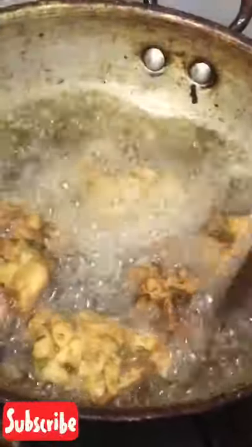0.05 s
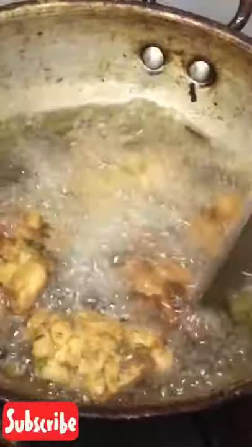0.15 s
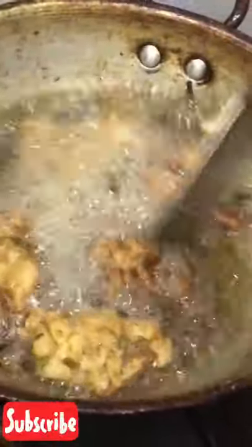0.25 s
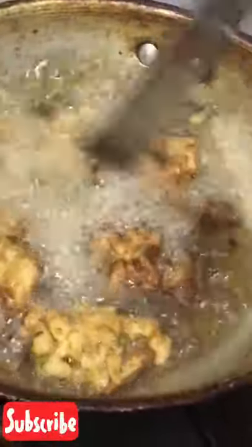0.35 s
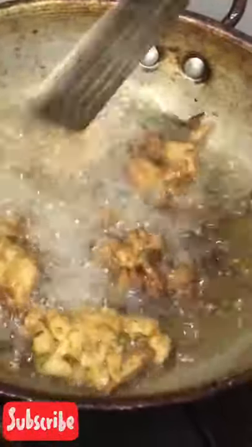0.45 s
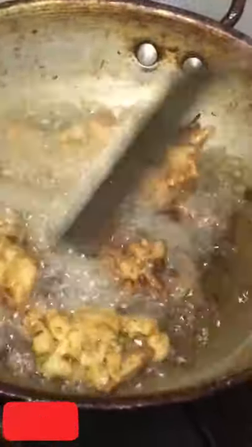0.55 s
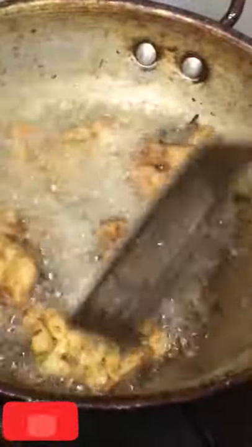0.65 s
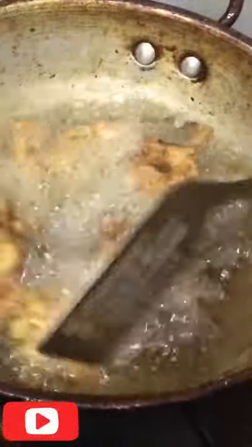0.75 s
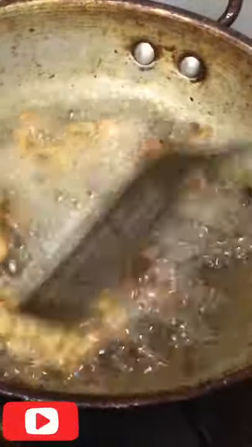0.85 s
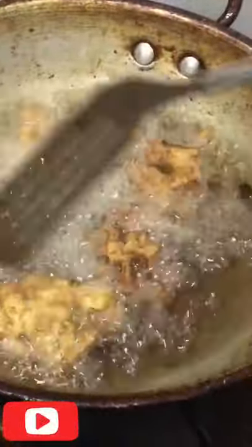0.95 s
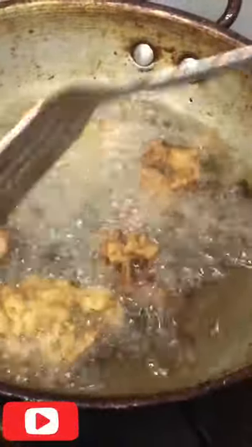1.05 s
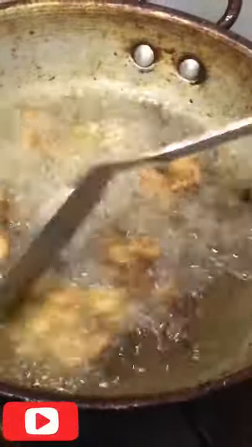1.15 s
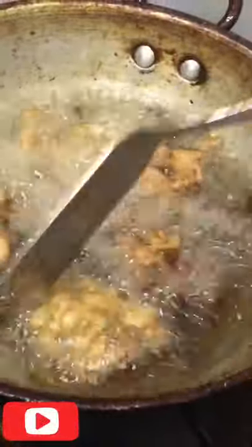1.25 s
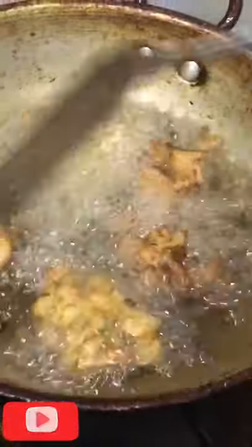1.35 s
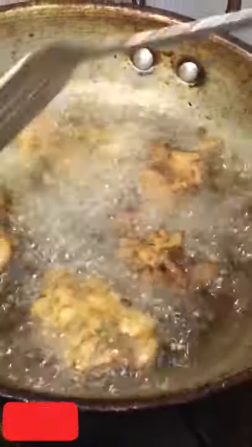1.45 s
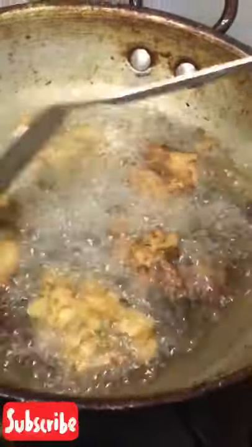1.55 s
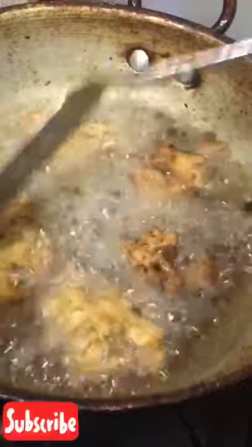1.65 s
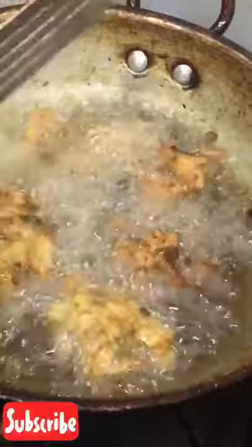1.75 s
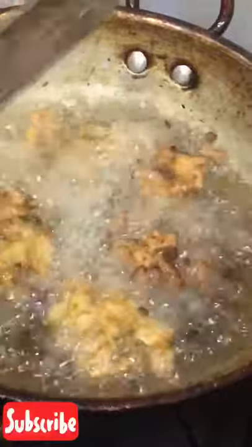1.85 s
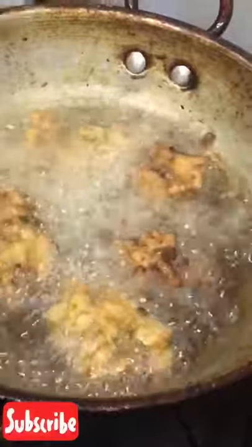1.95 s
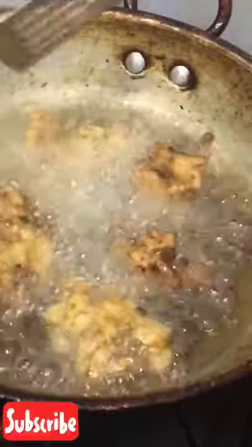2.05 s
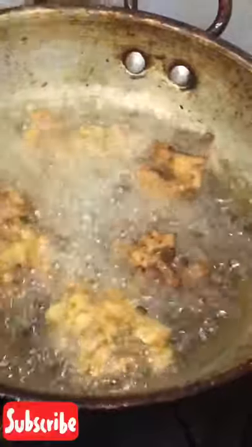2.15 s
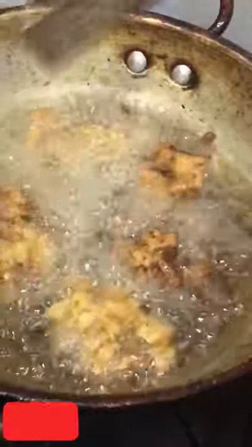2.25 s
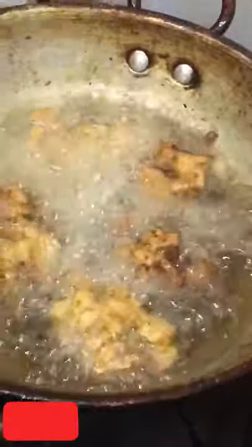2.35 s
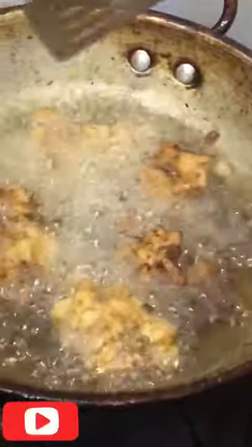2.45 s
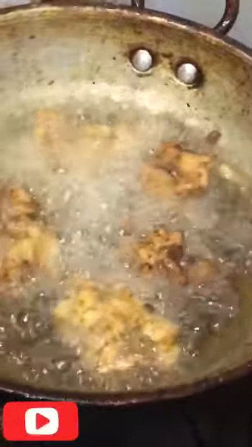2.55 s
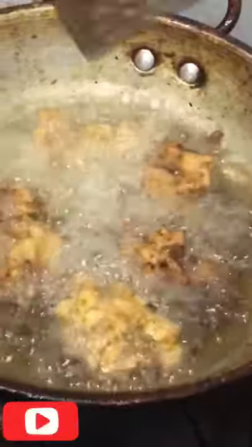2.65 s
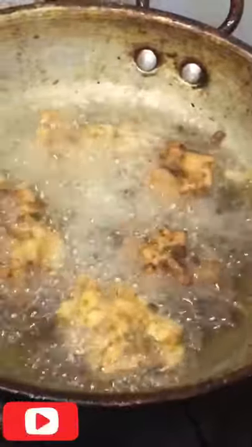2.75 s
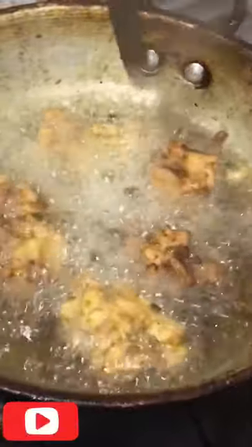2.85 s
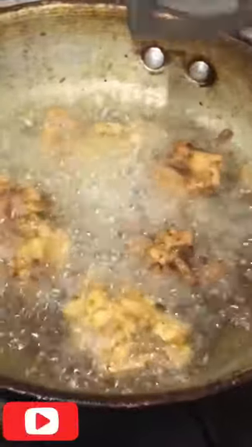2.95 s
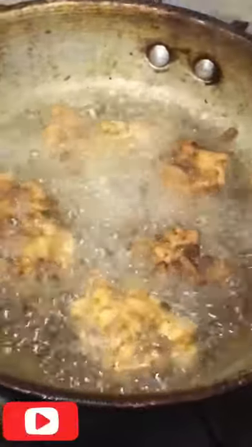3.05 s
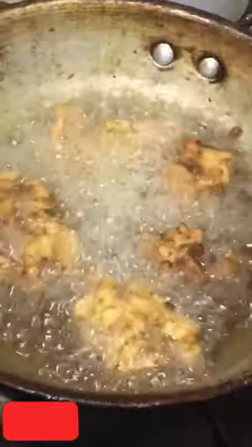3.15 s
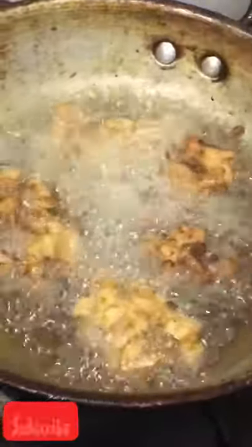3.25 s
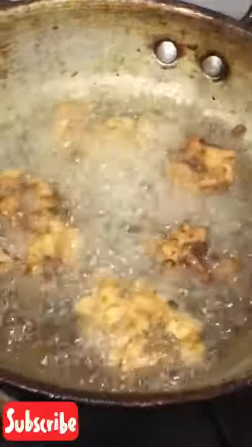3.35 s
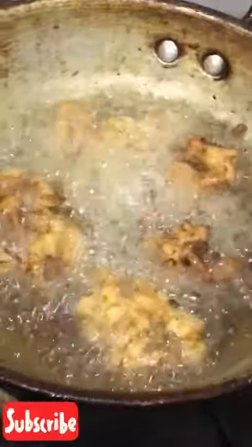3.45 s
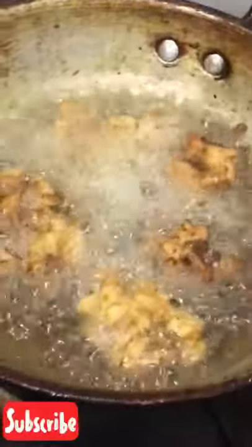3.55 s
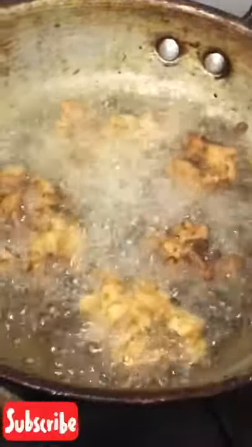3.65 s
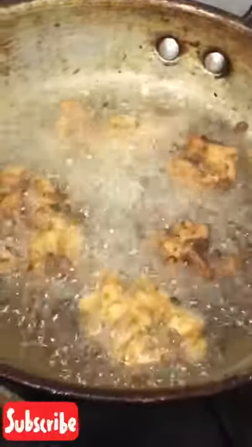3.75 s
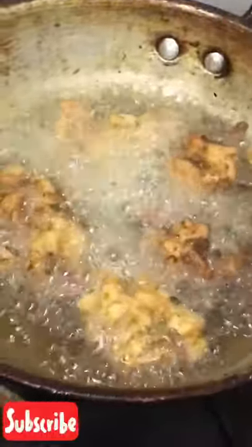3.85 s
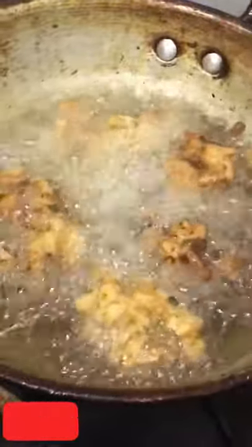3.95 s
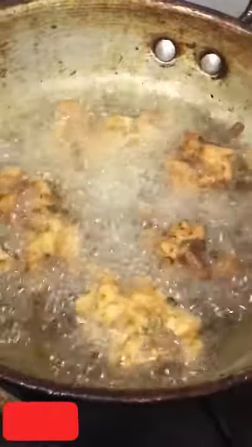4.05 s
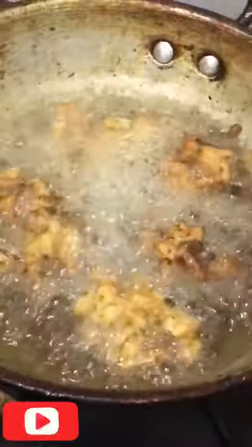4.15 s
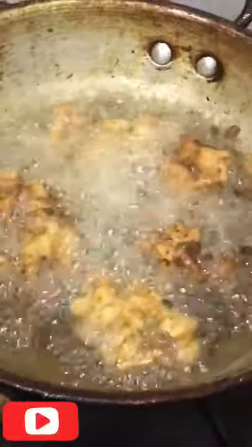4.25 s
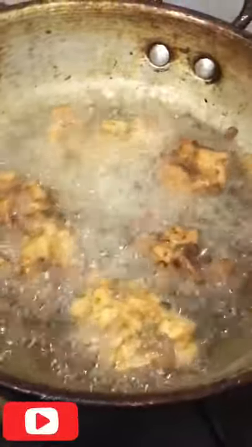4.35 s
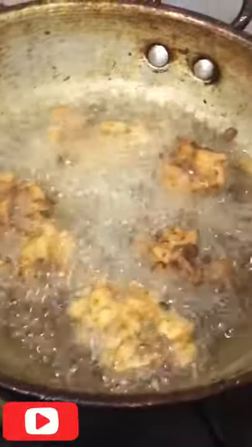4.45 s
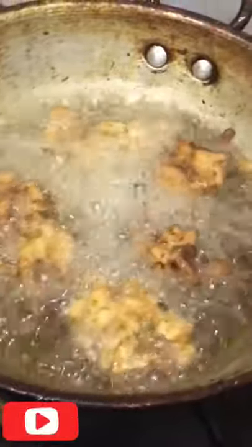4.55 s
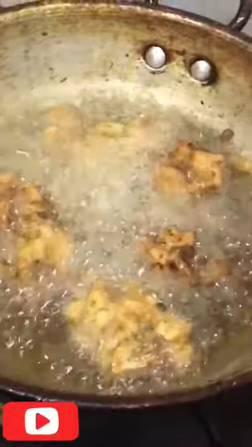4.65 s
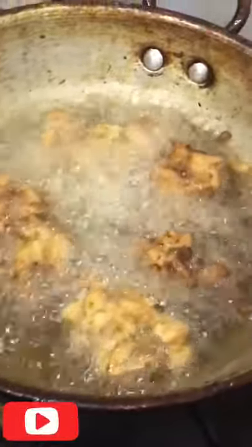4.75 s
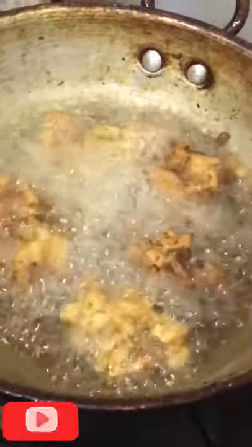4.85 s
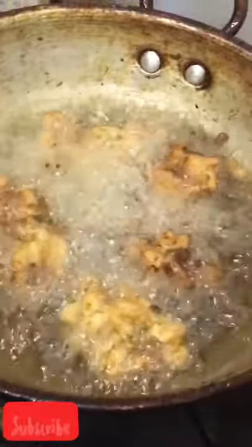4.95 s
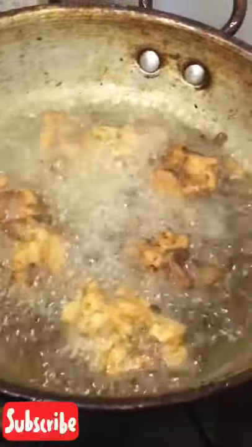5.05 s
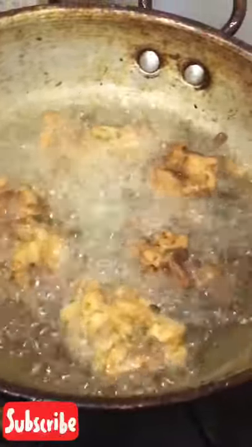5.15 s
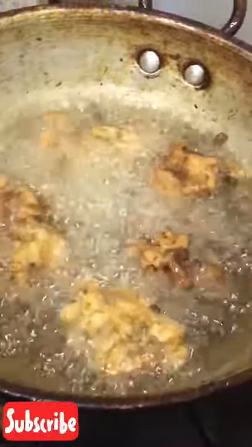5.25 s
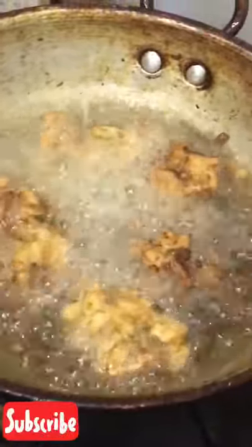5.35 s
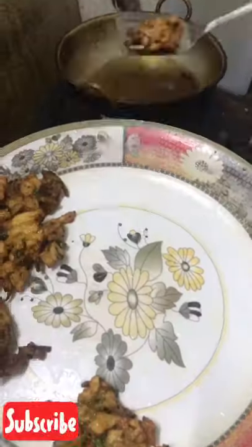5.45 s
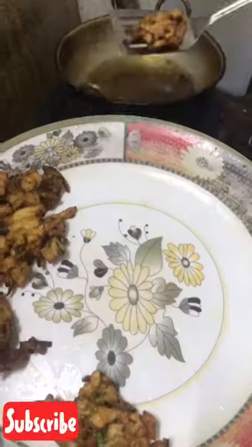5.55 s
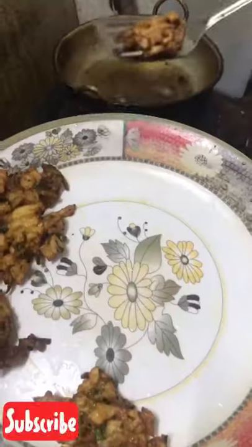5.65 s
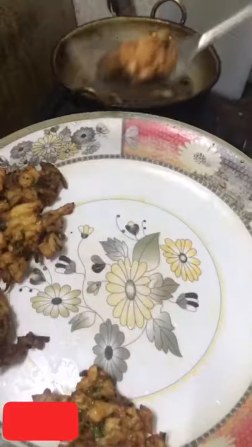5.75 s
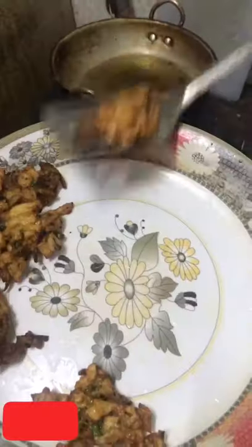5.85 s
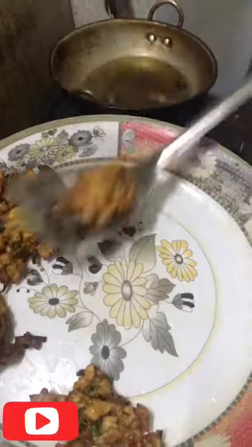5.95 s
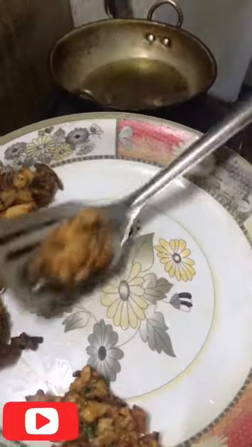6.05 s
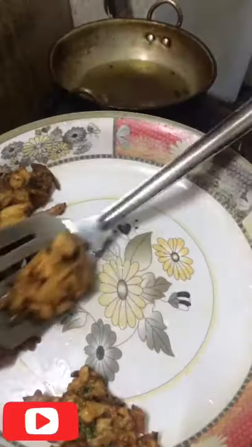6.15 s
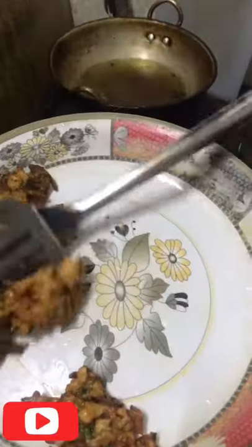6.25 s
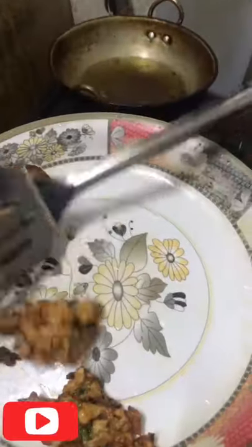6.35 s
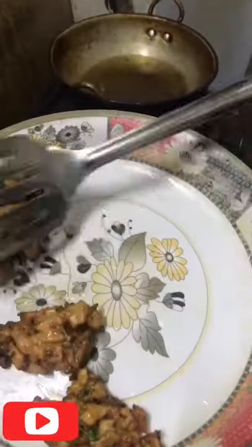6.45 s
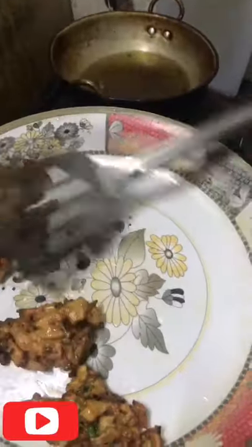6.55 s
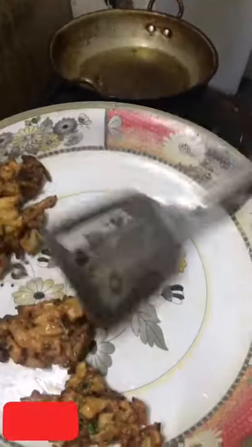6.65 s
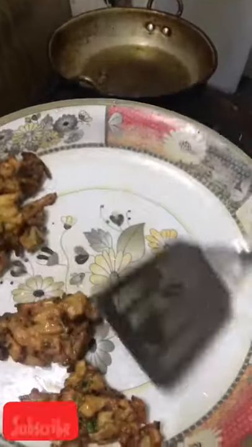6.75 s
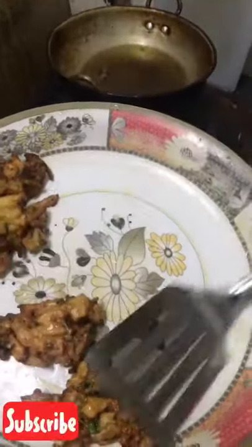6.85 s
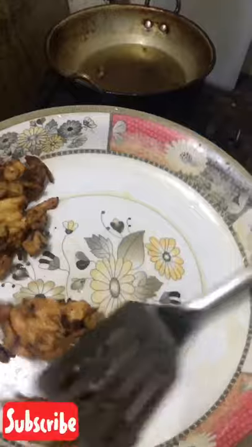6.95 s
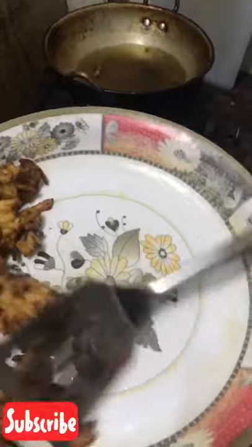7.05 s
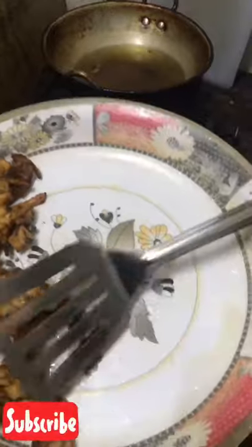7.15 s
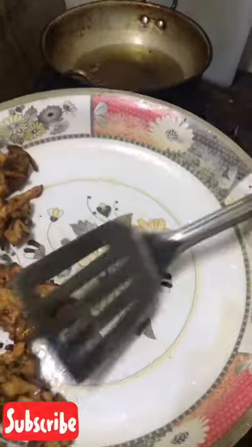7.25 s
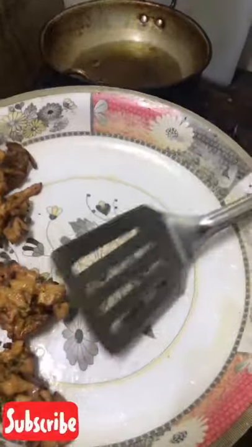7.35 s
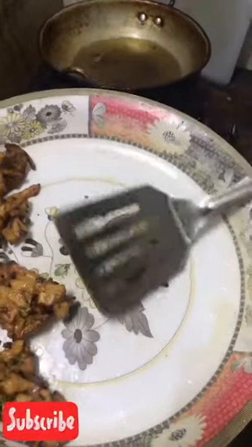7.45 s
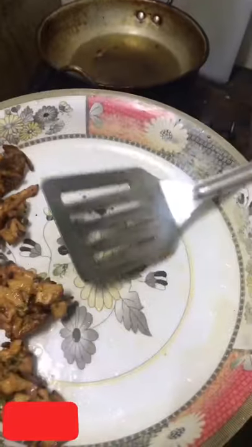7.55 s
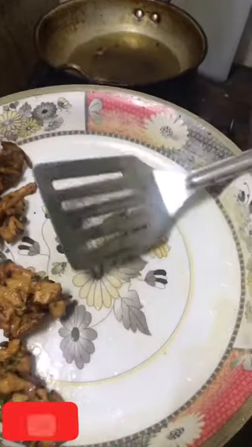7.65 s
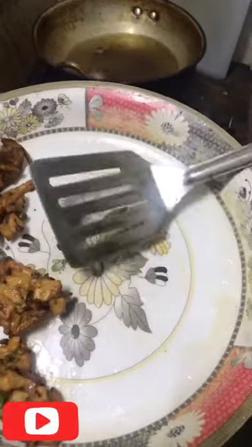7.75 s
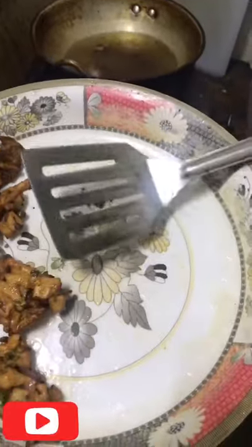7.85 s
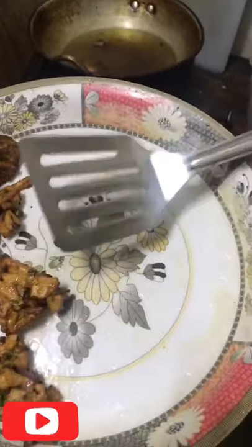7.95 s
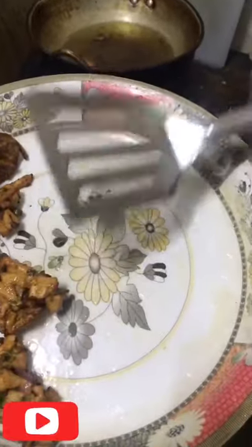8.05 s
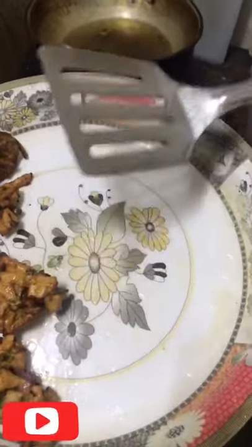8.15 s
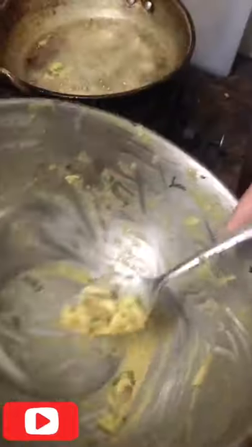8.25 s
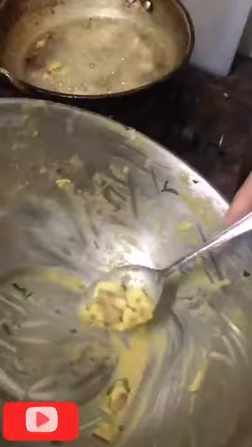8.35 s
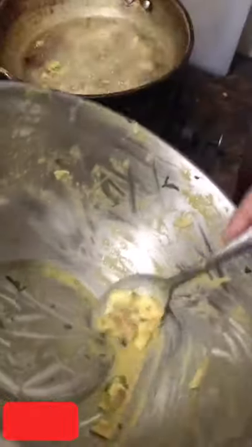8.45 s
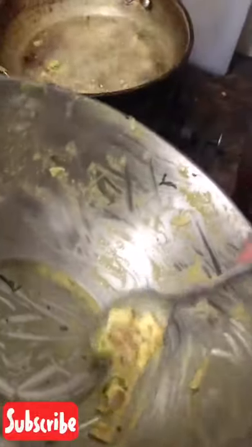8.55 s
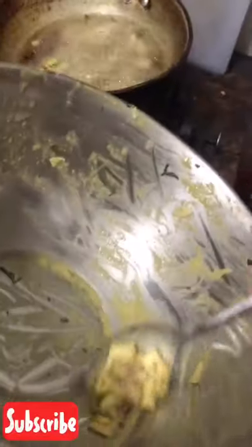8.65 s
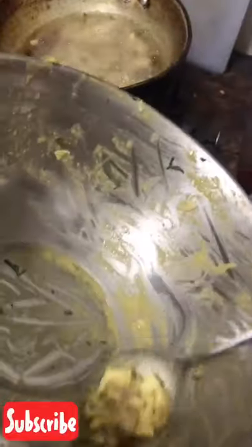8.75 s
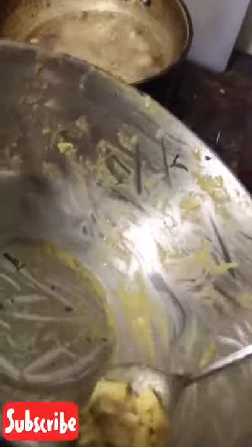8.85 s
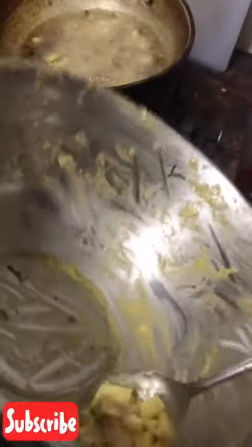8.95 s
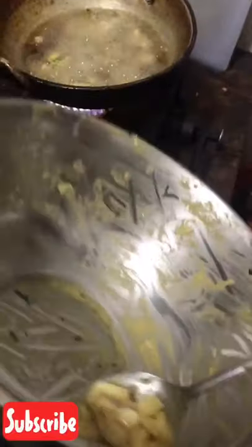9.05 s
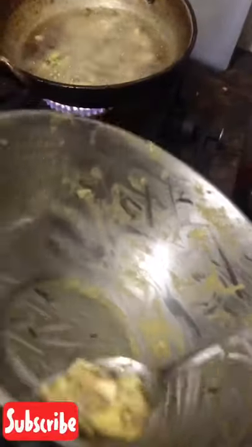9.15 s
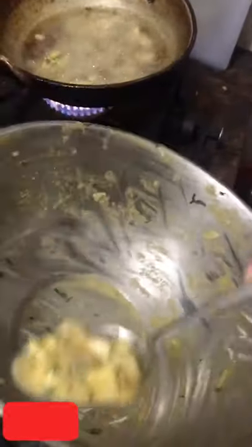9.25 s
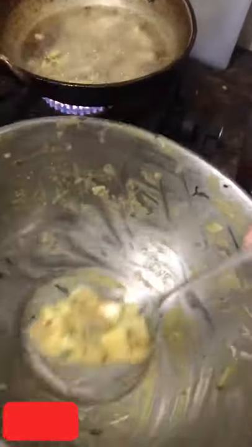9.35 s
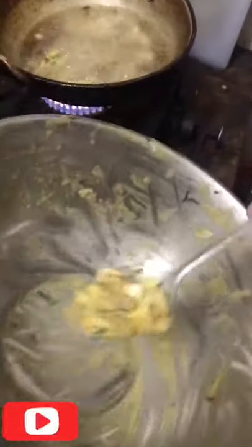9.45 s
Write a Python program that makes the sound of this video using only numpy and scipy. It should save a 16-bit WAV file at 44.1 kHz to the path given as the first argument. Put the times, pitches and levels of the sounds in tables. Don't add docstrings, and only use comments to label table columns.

```python
import sys
import numpy as np
from scipy import signal
from scipy.fft import rfft, irfft, next_fast_len
from scipy.io import wavfile
from scipy.ndimage import uniform_filter1d

SR = 44100
rng = np.random.default_rng(int(sys.argv[2]) if len(sys.argv) > 2 else 0)


def ratio_of_db(decibels):
    return 10 ** (np.asarray(decibels, float) / 20)


def waveform_to_disk(signal):
    frames = np.transpose(np.atleast_2d(signal))
    scaled = np.clip(frames, -1, 1) * 32767
    samples = np.round(scaled).astype(np.int16)
    wavfile.write(sys.argv[1], SR, samples)


N = 418509

CHANGES = [
    5.487,
    8.252,
]


def level(x, db):
    return x * ratio_of_db(db) / np.sqrt(np.mean(x ** 2))


def curve(rows, off_db=None):
    s, db = np.transpose(rows)
    return np.interp(np.arange(N) / SR, s, db, off_db, off_db)


def colour(x, points):
    hz, db = np.transpose(points)
    size = next_fast_len(len(x))
    f = np.fft.rfftfreq(size, 1 / SR) + 1
    gain_db = np.interp(np.log(f), np.log(hz), db)
    return irfft(rfft(x, size) * ratio_of_db(gain_db), size)[:len(x)]


def band(x, hz, width_hz):
    return signal.lfilter(*signal.iirpeak(min(hz, .45 * SR), hz / width_hz, SR), x)


def walk(rate):
    k = int(SR / rate)
    held = np.repeat(rng.standard_normal(N // k + 1), k)
    return 1.68 * uniform_filter1d(held, k)[:N]


def clicks(rate, spread_db):
    chance = rng.random((3, N))
    rank = -np.log(1 - .97 * chance[2])
    return (chance[0] < rate / SR) * np.sign(chance[1] - .5) * ratio_of_db(spread_db * rank)


def add(out, s, sound):
    i = int(s * SR)
    out[i:i + len(sound)] += sound[:N - i]


def shots():
    t = np.arange(N) / SR
    dip = np.prod([np.clip(np.abs(t - s) / .011, .05, 1) for s in CHANGES], axis=0)
    return np.searchsorted(CHANGES, t), dip


def frying(shot):
    # [pitch_hz, level_db per Hz]
    hiss = [
        [(76, -4), (130, -8), (156, -13.5), (275, -19), (305, -16), (381, -14), (421, -21), (448, -19),
         (582, -17), (713, -17.5), (1360, -15.5), (1960, -20), (12400, -21), (15500, -16), (16500, -50)],
        [(76, -51), (130, 4), (141, -20), (176, -1.5), (330, -8), (404, -11.5), (582, -17.5), (619, -20.5),
         (743, -20), (822, -18), (986, -17), (2170, -20.5), (13500, -15), (15500, -7.5), (16500, -44)],
        [(76, -34), (130, -23), (173, -10), (311, -6), (381, -14.5), (466, -12), (594, -13.5), (1570, -18),
         (1960, -19.5), (2950, -20), (3330, -25), (3760, -18.5), (5990, -21.5), (15500, -23.5), (16500, -40)],
    ]
    # [start_s, level_db]
    hiss_level = [
        [(0.0, -41), (0.67, -42), (1.0, -41), (5.47, -41.5)],
        [(5.5, -49.5), (5.99, -43), (6.81, -45), (6.94, -41), (7.07, -40), (7.12, -45), (8.24, -47)],
        [(8.27, -49.5), (8.56, -47.5), (9.49, -48.5)],
    ]
    fizz, swell = 0, walk(8.3)
    for hz in 150 * 2 ** np.arange(0, 7, .5):
        steam = rng.standard_normal(N) * ratio_of_db(0.58 * swell + 0.72 * walk(25))
        bursts = level(clicks(rate=hz / 14, spread_db=3.0), -4.0)
        fizz = fizz + np.sqrt(hz) * level(band(steam + bursts, hz, hz / 2.22), 0)
    fizz = fizz + level(clicks(rate=300, spread_db=2.5), 26)
    parts = [level(colour(fizz, c), 0) * ratio_of_db(curve(f)) for c, f in zip(hiss, hiss_level)]
    return ratio_of_db(-0.5) * np.choose(shot, parts)


def fan(shot):
    # [pitch_hz, width_hz, level_db in shots 1, 2 and 3]
    room_modes = [(34.4, 54, -72, -69, -60.5), (47.5, 6.8, -48.5, -60.5, -74), (53, 3.3, -79, -53, -59),
                  (75.8, 7.7, -50, -56.5, -56.5), (91.65, 3.8, -49, -59, -56),
                  (115.7, 3.6, -46, -55.5, -55.5), (131.5, 27, -57, -58, -57),
                  (228.9, 9.4, -61.5, -65.5, -60), (270.9, 9.6, -61.5, -70.5, -64),
                  (644.7, 31, -61.5, -66, -67), (816, 37, -79, -63.5, -66)]
    blade_steadiness = 0.78
    out = np.zeros(N)
    for hz, width_hz, *db in room_modes:
        ring = band(band(rng.standard_normal(N), hz, width_hz), hz, 2 * width_hz)
        if 105 < hz < 124:
            power = uniform_filter1d(ring ** 2, size=1200) + 1e-12
            ring = ring / power ** (blade_steadiness / 2)
        out = out + level(ring, 0) * ratio_of_db(np.array(db)[shot] + 0.2 * walk(1.37))
    return out


def crackle():
    pitch_range = (600, 12000)
    level_at_6khz_db, db_per_octave, scatter_db = -34.5, 4.5, 9
    when, size, luck = rng.random((34, 3)).T
    hz = pitch_range[0] * (pitch_range[1] / pitch_range[0]) ** size
    db = level_at_6khz_db + db_per_octave * np.log2(hz / 6000) + scatter_db * (2 * luck - 1)
    return list(zip(when * CHANGES[0], db, hz))


def pops():
    # [start_s, peak level_db, pitch_hz, cycles rung, snap_db]
    large = [(0.0532, -15, 13800, 3, -7.5), (0.14, -24, 2400, 1.8, 9), (0.1414, -22.5, 520, 1.4, 5.5),
             (0.588, -10.5, 2840, 9.2, -13), (0.588, -15, 3550, 6.9, -24), (0.589, -15, 5900, 14, -20),
             (0.655, -28, 3930, 7.9, -20), (0.655, -20, 5970, 14, -13), (0.877, -13, 1330, 3.2, -15),
             (0.922, -13.5, 7600, 2.1, -4), (0.922, -26, 1690, 2, -11), (0.946, -28, 6500, 8, -7),
             (0.97, -25, 3330, 6.7, -20), (0.969, -19.5, 4050, 5.2, -24), (1.0448, -20.5, 1490, 1.5, -6),
             (1.149, -6.5, 3100, 8, -32), (1.149, -16.5, 2590, 12, -30), (1.149, -20, 4270, 11.5, -28),
             (1.149, -20.5, 6820, 14, -28), (1.3015, -12.5, 10400, 1.93, -12.5),
             (1.454, -19, 4770, 1.2, -9), (2.054, -10, 12300, 4.7, -15), (2.648, -17, 7200, 8.7, -25),
             (2.713, -23.5, 7000, 9.7, -21), (2.877, -26, 6640, 15, -12), (2.8786, -17, 2040, 1.7, -11),
             (2.9377, -16.5, 2500, 5, -8), (2.957, -24, 4500, 4, -6), (2.987, -29, 1300, 2, -9),
             (2.9356, -8, 3320, 1.8, -7.5), (3.548, -18, 5700, 1.3, 5), (3.862, -18.5, 9170, 8.7, 3),
             (3.993, -16, 8100, 1.2, 6), (4.263, -12, 3070, 4.6, -22), (4.569, -20.5, 4330, 10, -29),
             (4.999, -20.5, 3400, 2.1, -17), (5.194, -23, 1430, 2.1, -18), (5.193, -22.5, 2330, 4, -18),
             (5.424, -17, 13100, 3.6, -6)]
    # [start_s, peak level_db, pitch_hz]
    spits = [(8.565, -32, 9000), (0.223, -23, 5370), (0.288, -21, 10100), (0.354, -23, 6670),
             (0.606, -24, 6600), (0.846, -20.5, 6930), (0.859, -15, 12700), (0.983, -22.5, 6000),
             (1.077, -20, 7300), (1.0894, -26, 4450), (1.235, -21, 6600), (1.401, -31, 2100),
             (1.503, -21.5, 4300), (1.575, -18, 12500), (1.595, -18, 9630), (1.604, -20, 9400),
             (1.72, -22, 12400), (1.808, -29.5, 2640), (2.039, -21, 11700), (2.145, -24.5, 5040),
             (3.31, -26, 5300), (3.457, -20.5, 6130), (3.919, -20.5, 6700), (3.942, -21, 11500),
             (4.342, -19, 13000), (4.385, -21, 7500), (4.453, -29, 5500), (5.093, -26, 8200),
             (5.364, -16, 14300), (7.0284, -11, 14400)]
    # [start_s, peak level_db, pitch_hz]
    faint_spits = [(0.079, -30, 4500), (0.091, -29, 9500), (0.168, -26, 13500), (0.21, -27, 9500),
                   (0.277, -33, 4000), (0.634, -25, 11800), (1.05, -23, 7000), (1.975, -33, 6000),
                   (2.091, -32, 6500), (2.1215, -28, 11000), (2.317, -32, 6300), (2.458, -38, 3300),
                   (2.6865, -31, 13000), (2.7715, -33, 5900), (2.8315, -35, 5300), (3.442, -33, 5800),
                   (3.731, -34, 3200), (3.853, -35, 1980), (3.8915, -30, 6000), (4.2405, -30, 10000),
                   (4.2975, -32, 8500), (4.641, -37, 2100), (4.683, -32, 6000), (4.9475, -26, 9300),
                   (5.0505, -33.5, 3000)]
    spit_cycles, spit_snap_db, faint_lift_db = 3.74, -16, 3.5
    glide = 0.029
    faint = [(s, db + faint_lift_db, hz) for s, db, hz in faint_spits]
    small = [(*row, spit_cycles, spit_snap_db) for row in list(spits) + faint + crackle()]
    rows = list(large) + small
    out, t = np.zeros(N), np.arange(1200) / SR
    for (s, db, hz, cycles, snap_db), dice in zip(rows, rng.standard_normal((len(rows), 1200))):
        turns = t * hz / max(cycles, 1)
        shape = np.exp(-turns / 0.65) * np.minimum(turns / 0.12, 1)
        tone = np.cos(2 * np.pi * hz * t * (1 + glide * (turns - .5)))
        ring = band(shape * (tone + 0.4 * dice), hz, 4 * hz / max(cycles, 1))
        for ratio, over_db in (1.4, -6), (2.2, -26):
            ring = ring + ratio_of_db(over_db) * band(shape * dice, min(ratio * hz, 14000), 0.1 * hz)
        snap = band(dice * np.exp(-t / 0.002), min(hz, 9000), 3 * min(hz, 3500))
        sound = ring / np.abs(ring).max() + ratio_of_db(snap_db) * snap / np.abs(snap).max()
        add(out, s, ratio_of_db(db) * sound / np.abs(sound).max())
    return out


def sputter():
    # [start_s, level_db, centre pitch_hz, width_hz, t60_s]
    sprays = [
        (0.143, -37, 800, 900, 0.22),
        (0.592, -36, 3100, 1300, 0.21),
        (.88, -31.5, 1200, 900, 0.088),
        (1.151, -38, 3100, 1500, 0.14),
        (2.881, -38, 1500, 2500, 0.1),
        (2.94, -41, 2800, 4500, 0.2),
        (2.94, -37.5, 750, 600, 0.18),
        (4.263, -44, 2950, 1600, .08),
        (5.195, -42, 650, 400, 0.18),
        (1.589, -42.5, 170, 60, 0.2),
    ]
    out, t = np.zeros(N), np.arange(SR // 4) / SR
    for (s, db, hz, width_hz, t60), dice in zip(sprays, rng.standard_normal((len(sprays), 2, len(t)))):
        spray = band(dice[0] * np.abs(dice[1]), hz, width_hz)
        add(out, s, level(spray, db) * ratio_of_db(-60 * t / t60))
    return out


def pressure(rows):
    attack_db_s, release_db_s = 307, 650
    t = np.arange(N) / SR
    out = np.zeros(N)
    for s, held, db in rows:
        rise_db = attack_db_s * np.maximum(s - t, 0)
        fall_db = release_db_s * np.maximum(t - s - held, 0)
        out = out + ratio_of_db(db - rise_db - fall_db)
    return out


def rings(x, modes):
    return sum(band(x, hz, width_hz) * ratio_of_db(db) * np.sqrt(SR / np.pi / width_hz) for hz, width_hz, db in modes)


def scraping(shot):
    # [start_s, length held_s, level_db]
    scrapes = [
        (1.585, 0.043, -53),
        (7.072, 0.007, -50),
        (7.086, 0.0073, -47.5),
        (8.72, 0.079, -46),
        (9.105, 0.022, -54),
    ]
    # [pitch_hz, level_db per Hz]
    scrape_spectrum = [(290, -34), (600, -13), (1190, -27), (2290, -29), (5200, -28), (6400, -15.5),
                       (11500, -20), (16500, -27)]
    # [pitch_hz, width_hz, level_db]
    bowl_modes = [(608, 3.1, -4), (734, 6, -12), (830, 3.7, -12), (1180, 67, -17), (3360, 80, -7),
                  (4300, 200, -15)]
    # [start_s, length held_s, level_db]
    slides = [
        (6.87, 0.068, -38),
        (6.996, 0.038, -48),
        (7.072, 0.023, -49.5),
    ]
    # [pitch_hz, width_hz, level_db]
    plate_modes = [(750, 160, -1), (1300, 900, -3), (2450, 150, -15), (2900, 96, -10), (3400, 3000, -12),
                   (4200, 150, -12)]
    slips = clicks(rate=6400, spread_db=3) + rng.standard_normal(N)
    slips = level(slips * ratio_of_db(2.5 * walk(90)), 0)
    scrape = pressure(scrapes)
    slide = pressure(slides) * ratio_of_db(1.8 * walk(150))
    in_bowl = slips * scrape * (shot == 2)
    rasp = level(colour(slips, scrape_spectrum), 4.2) * scrape
    return rasp + rings(in_bowl, bowl_modes) + rings(slips * slide, plate_modes)


def whistle():
    # [start_s, level_db]
    leak_level = [(5.49, -62), (5.75, -62), (6.1, -63), (6.5, -62), (6.95, -72)]
    start_hz, rise_hz_s2, drift_hz = 9620, 300, 11.6
    since = np.maximum(np.arange(N) / SR - CHANGES[0], 0)
    leak_hz = np.minimum(start_hz + rise_hz_s2 * since ** 2, 11000) + drift_hz * walk(20)
    return np.sin(2 * np.pi * np.cumsum(leak_hz) / SR) * ratio_of_db(curve(leak_level, -120) + 3 * walk(30))


def ringing(modes, dice, t):
    hz, db, t60 = np.transpose(modes)[:, :, None]
    gain, detune = 2 * dice[:len(hz), None], 1 + dice[20:20 + len(hz), None] / 600
    decay = np.exp(-np.log(1000) * t / t60)
    sound = np.sum(ratio_of_db(db + gain) * decay * np.sin(2 * np.pi * hz * detune * t), axis=0)
    return sound / np.abs(sound).max()


def blows(rows, low, steel, clack, lasts_s=.35, grit_db=-13.5):
    longest_rattle_ms, rattle_ms_per_bright_db = 2.6, -1.8
    contact_ms, boom_rise_ms = 0.59, 1.36
    chatter_share = 0.48
    splash_db, splash_t60_s = -21.5 + grit_db + 13.5, 0.24
    out, t = np.zeros(N), np.arange(int(lasts_s * SR)) / SR
    early = t[:4000]
    rise = np.minimum(t * 1000 / contact_ms, 1)
    for (s, db, low_db, ring_db, tilt_db), dice in zip(rows, rng.standard_normal((len(rows), 2, len(t)))):
        rattle_ms = max(longest_rattle_ms + rattle_ms_per_bright_db * tilt_db, .3)
        force = (dice[0] * np.abs(dice[1]) * np.exp(-t * 1000 / rattle_ms) * rise)[:4000]
        grit = level(band(band(force, 2300, 2500), 2300, 3000), grit_db - tilt_db)
        rough = grit + level(band(force, 8600, 15000), -24 + 2 * tilt_db)
        for k, (hz, width_hz, mode_db) in enumerate(clack):
            phase = 2 * dice[0, 40 + k]
            clean = rise[:4000] * np.exp(-np.pi * width_hz * early) * np.sin(2 * np.pi * hz * early + phase)
            mode = level(clean, 0) + chatter_share * level(band(force, hz, 2 * width_hz), 0)
            rough = rough + level(mode, mode_db + tilt_db * np.log2(hz / 2000) + 1.4 * dice[1, k])
        boom = ringing(low, dice[0], t) * (1 - np.exp(-t * 1000 / boom_rise_ms))
        splash = band(dice[0, ::-1], 1600, 5400) * ratio_of_db(splash_db - 60 * t / splash_t60_s)
        tail = splash + ratio_of_db(low_db + 14.5) * boom + ratio_of_db(ring_db) * ringing(steel, dice[1], t)
        add(out, s + 0.00084, ratio_of_db(db) * rough / np.abs(rough).max())
        add(out, s + 0.00078, ratio_of_db(db) * tail)
    return out


def spatula_on_plate():
    # [start_s, peak level_db, boom_db, ring_db, brightness in dB per octave]
    landing = [
        (5.8905, 0, -24.5, -41, .1),
        (5.8935, -7.5, -27, -35, 1),
    ]
    slaps = [
        (6.77, -9.5, -46, -6, -0.36),
        (6.7743, -6, -20.5, -11, -0.5),
        (6.802, -32, -28, -14, -6),
        (6.823, -15.5, -17, -20, -2.5),
        (6.828, -22, -30, -25, 0),
        (7.3788, -7.5, -21.5, -19, 0.5),
        (7.3825, -17, -14.5, -25, -2),
        (7.443, -21, -16.5, -20, -3),
    ]
    ticks = [
        (7.409, -42, -22, 2, -2),
        (7.468, -47, -20, 1, 0),
        (7.481, -43, -10, 5, -4),
        (7.5, -42, -8, 6, -4),
        (7.522, -47, -10, 2, -4),
        (7.55, -42, -20, 2, -4),
        (7.558, -40.5, -11, 3, -9),
        (7.585, -50, -15, 1, -6),
        (7.605, -48, -13, 3, -3),
    ]
    knocks = [
        (6.173, -9.5, -19.5, -42, -1.5),
        (6.203, -22.5, -30, -40, -5),
        (6.226, -36, -30, -40, 2),
        (6.929, -17, -15, -39, 0),
        (6.87, -17, -18, -30, -4),
        (6.899, -37, -25, -35, 2),
        (7.025, -26.5, -26, -35, 0),
    ]
    nudges = [
        (6.259, -30, -11, -35, -9),
        (6.29, -42, -12, -35, -4),
        (6.304, -30, -14, -33, -6),
        (6.331, -16.5, -14.5, -37, -3),
        (6.366, -23.5, -20, -36, -5.5),
        (6.384, -27.5, -16, -30, 11),
        (6.434, -18.5, -17.5, -36, -0.5),
        (6.465, -35, -31, -35, -9),
        (6.962, -34, -18, -30, -2),
        (7.05, -34, -10, -32, -3),
    ]
    flips = [
        (6.854, -8, -17.5, -36, -1),
        (6.862, -15, -28, -30, -7),
        (6.914, -11, -16, -30, 0.5),
        (6.995, -26, -18, -32, -3),
    ]
    # [pitch_hz, level_db, t60_s]
    blade = [(2020, 12, 0.063), (2080, 12, 0.075), (2472, 8, 0.1), (3060, -8, 0.1), (1355, 2, .12),
             (738, 0, 0.2)]
    # [pitch_hz, level_db, t60_s]
    plate_boom = [(344, -3, 0.082), (354, -2.5, 0.19), (258, -9, 0.087), (189, -15.5, 0.069),
                  (685, -8.5, 0.043), (1117, -16, 0.068)]
    landing_boom = [(346.8, 0, 0.15), (357.6, -27, 0.41), (260, -8.5, 0.07), (170, -10, 0.044),
                    (800, -18, 0.046), (1180, -15, 0.05)]
    # [pitch_hz, width_hz, level_db]
    slap_clack = [(677, 91, -7.5), (1364, 130, -6), (1620, 83, -16), (2036, 70, 0.5), (2476, 47, -6),
                  (3000, 120, -8), (3790, 140, -9), (4094, 63, -8), (234, 52, -11.5), (4770, 90, -12),
                  (5140, 70, -14), (5900, 140, -14), (7000, 540, -9.5), (9000, 900, -16),
                  (12500, 1200, -26)]
    flat_clack = [(800, 114, -3.5), (1147, 200, 1.5), (1430, 100, -5), (1790, 60, -15), (2080, 80, -3.5),
                  (2820, 67, -12.5), (3200, 77, -15), (3620, 110, -7.5), (4110, 60, -7.5), (4340, 60, -9),
                  (5800, 300, -11), (6600, 290, -15), (8400, 1100, -9), (13100, 1300, -9)]
    knock_clack = [(785, 81, -1), (1300, 110, -6), (1490, 75, -4.5), (2160, 70, -4), (2490, 60, -12),
                   (3100, 80, -1.5), (3400, 93, 1), (520, 82, -2), (4170, 63, -9.5), (4620, 72, -6),
                   (6080, 100, -6), (7400, 150, -4.5), (9100, 250, -22), (12100, 600, -16)]
    nudge_clack = [(560, 71, 4), (800, 100, 3.5), (1210, 110, -8), (1405, 70, 1), (2090, 87, 4),
                   (2400, 110, 3), (2730, 78, -4), (3100, 70, -5), (3680, 71, -7), (4230, 80, -10),
                   (4700, 70, -5), (5700, 200, -20), (8000, 600, -18)]
    flip_clack = [(584, 52, -2), (750, 62, 2), (1600, 55, -3), (2075, 60, 3), (2500, 43, 1), (3090, 82, 2),
                  (3680, 60, 0), (4110, 74, -0.5), (4370, 70, -4), (5230, 80, -9), (5800, 90, -9),
                  (7100, 250, -5), (9300, 400, -14)]
    flat = blows(landing, landing_boom, blade, flat_clack) + blows(slaps, plate_boom, blade, slap_clack)
    plate = flat - band(flat, 510, 146)
    plate = plate + blows(ticks, plate_boom, blade[:2], slap_clack)
    for rows, clack in (knocks, knock_clack), (nudges, nudge_clack), (flips, flip_clack):
        plate = plate + blows(rows, plate_boom, blade, clack)
    return plate


def spoon_on_bowl():
    # [start_s, peak level_db, boom_db, ring_db, brightness in dB per octave]
    taps = [
        (8.4565, -6, -16.5, -11, 0),
        (8.469, -23, -30, -20, 2),
    ]
    # [pitch_hz, level_db, t60_s]
    bowl_boom = [(423, -14.5, 0.49), (609.5, 8, 0.14), (610, -12, 1), (556, -10, 0.27), (680, -9, 0.15),
                 (741, -13, 0.22), (841, -19, 0.92), (348, -4.5, 0.12), (472, -10, .15)]
    bowl_ring = [(1000, -29, .5), (1093, -20, 0.61), (1464, -35, 0.8), (1840, -30, 0.12), (2340, -17, 0.27),
                 (2520, -4, 0.14), (2678, -14, 0.17), (3350, -5, 0.082), (3310, -3, 0.072), (4296, -22, .3)]
    # [pitch_hz, width_hz, level_db]
    bowl_clank = [(577, 44, 6), (1140, 200, -30), (1860, 90, -26), (2540, 70, -2), (3250, 130, 5),
                  (3400, 67, -1), (3750, 88, -4), (4590, 83, -7.5), (5157, 120, -10), (5700, 50, -4),
                  (6730, 150, -12), (7200, 170, -20), (8850, 240, -24), (11000, 520, -36)]
    return blows(taps, bowl_boom, bowl_ring, bowl_clank, lasts_s=0.99, grit_db=-13)


def even(x):
    spectrum = rfft(x)
    power = uniform_filter1d(np.abs(spectrum) ** 2, size=14)
    out = irfft(spectrum * np.sqrt(power.mean() / power), len(x))
    return out * (np.arange(len(x)) < .9 * len(x))


def kitchen(x):
    t = np.arange(SR // 2) / SR
    lumps = ratio_of_db(1.5 * walk(700)[:len(t)])
    echoes = rng.standard_normal((2, len(t))) * lumps * np.clip((t - .001) / 0.00071, 0, 1)
    wall_filter = signal.butter(1, [450, 3200], "band", fs=SR)
    near_filter = signal.butter(1, [600, 8000], "band", fs=SR)
    walls = signal.lfilter(*wall_filter, echoes[0]) * ratio_of_db(-60 * t / 0.35 - 38.5)
    near = signal.lfilter(*near_filter, echoes[1]) * ratio_of_db(-60 * t / 0.051 - 27.0)
    direct = t == 0
    return signal.fftconvolve(x, ratio_of_db(1.0) * even(direct + walls + near))[:N]


def scene():
    shot, dip = shots()
    events = pops() + scraping(shot) + spatula_on_plate() + spoon_on_bowl()
    steady = frying(shot) + fan(shot) + whistle() + sputter()
    return np.tile(dip * (steady + kitchen(events)), (2, 1))


def low_pass(x):
    return signal.sosfilt(signal.butter(12, 16990, fs=SR, output="sos"), x)


def record(dry):
    # [pitch_hz, level_db]
    mic_response = [(20, 1), (4300, 1), (4900, -1), (5500, 1), (7000, 0.5), (7700, -2), (8500, 0.5),
                    (9800, -0.5), (10500, -4), (11200, 1), (13000, 1), (15000, -3.5)]
    heard = colour(dry.mean(axis=0), mic_response)
    excess = np.maximum(np.abs(heard) - .05, 0)
    loudness = signal.lfilter([1 / 6000], [1, 1 / 6000 - 1], excess)
    x = heard / (1 + 40 * loudness)
    x = signal.sosfilt(signal.ellip(8, .2, 33, 15750, fs=SR, output="sos"), x)
    x = signal.sosfilt(signal.ellip(8, .2, 60, 16750, fs=SR, output="sos"), x)
    return low_pass(np.tile(np.clip(x, -.98, .98), (2, 1)))


dry = scene()
out = record(dry)
waveform_to_disk(out)
```